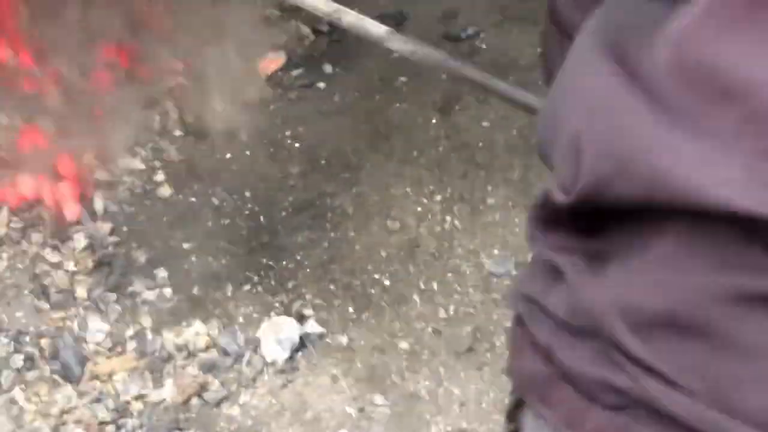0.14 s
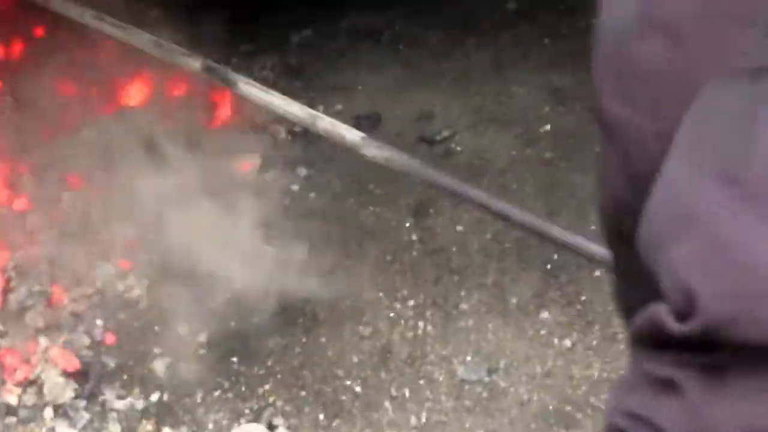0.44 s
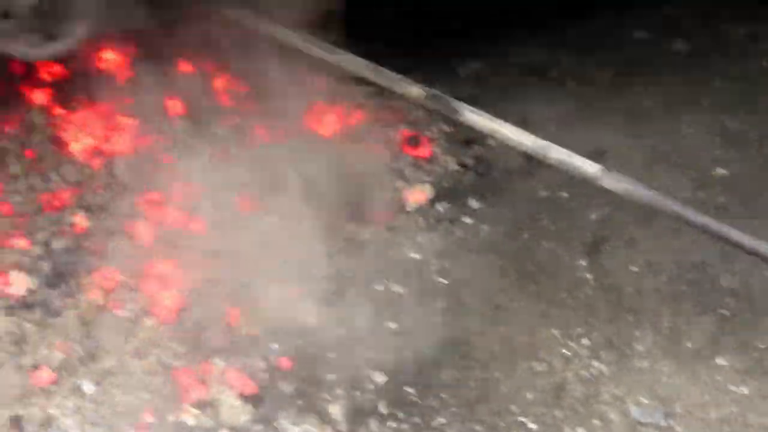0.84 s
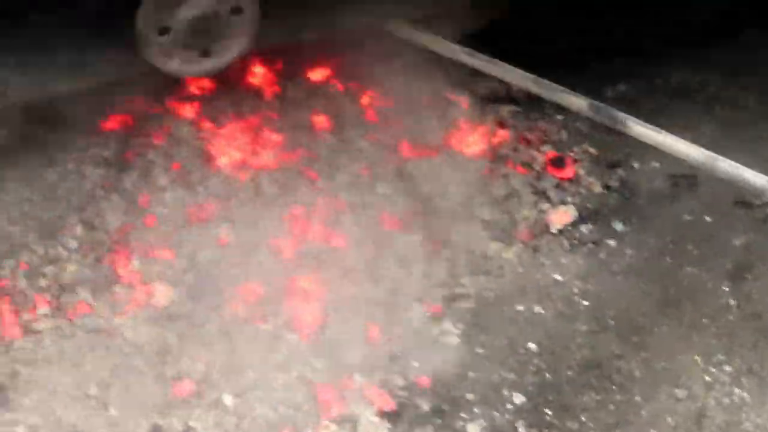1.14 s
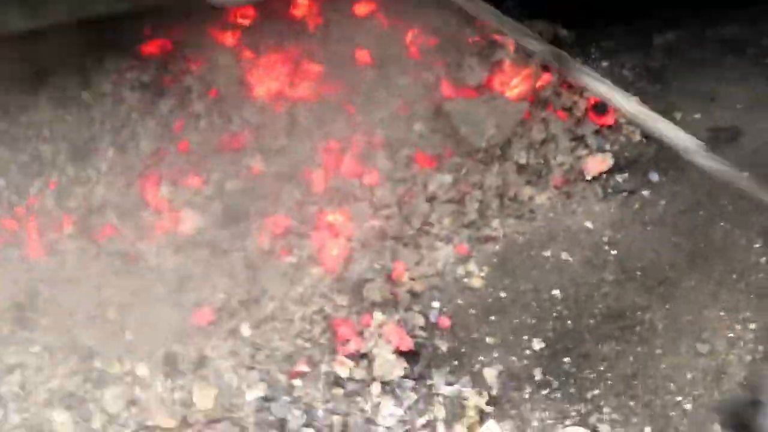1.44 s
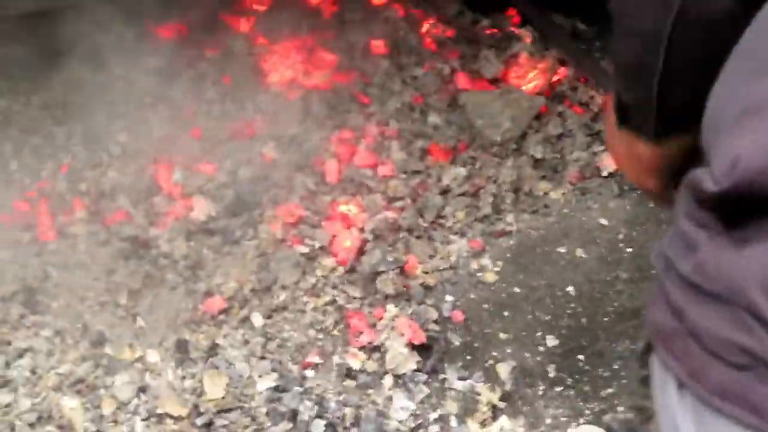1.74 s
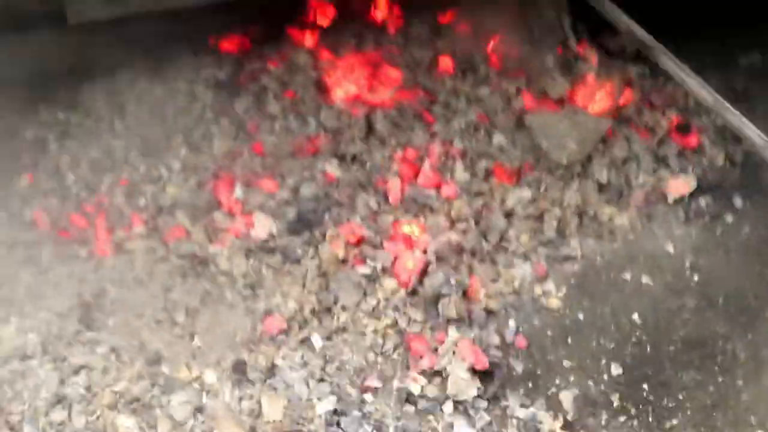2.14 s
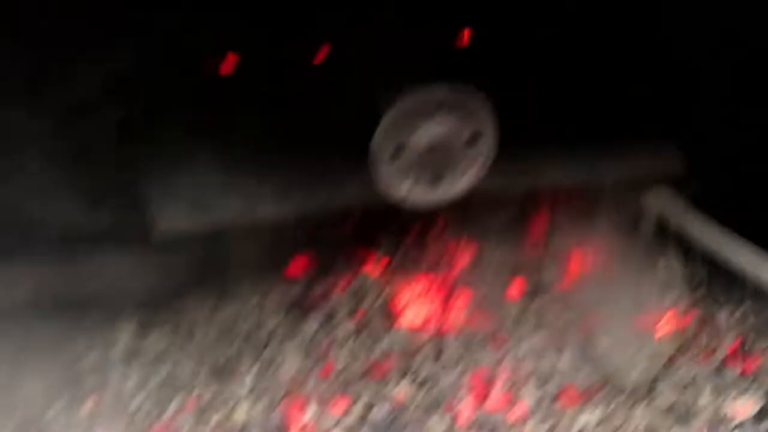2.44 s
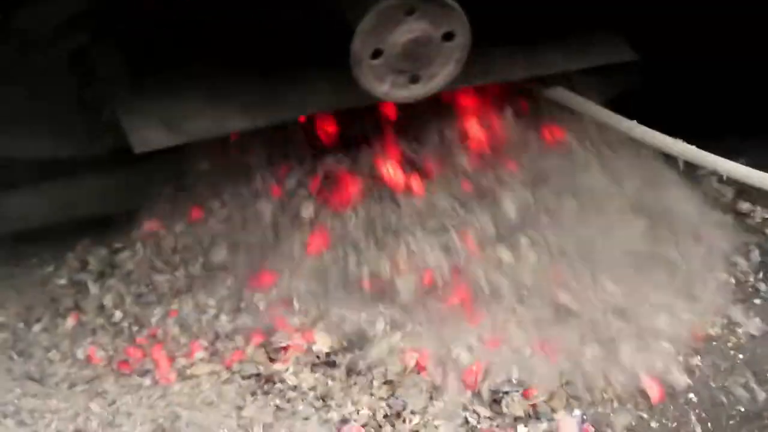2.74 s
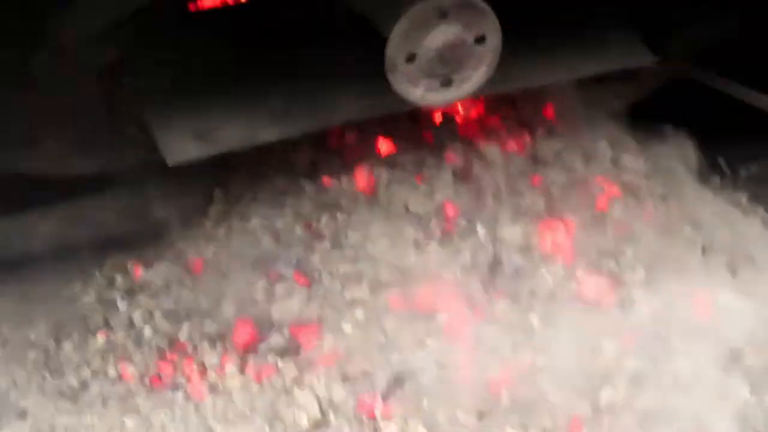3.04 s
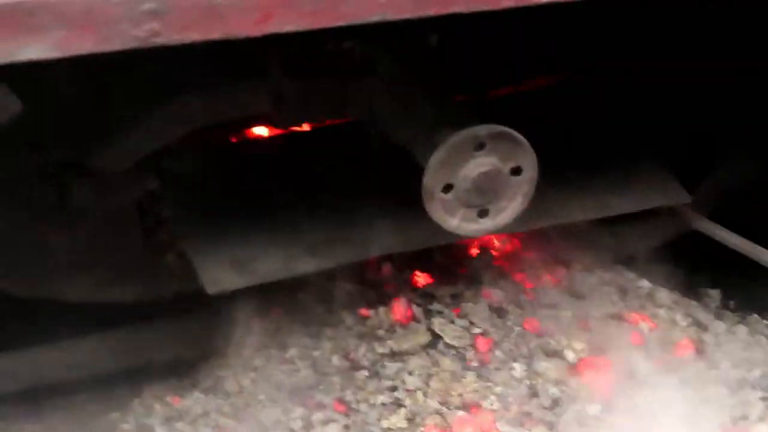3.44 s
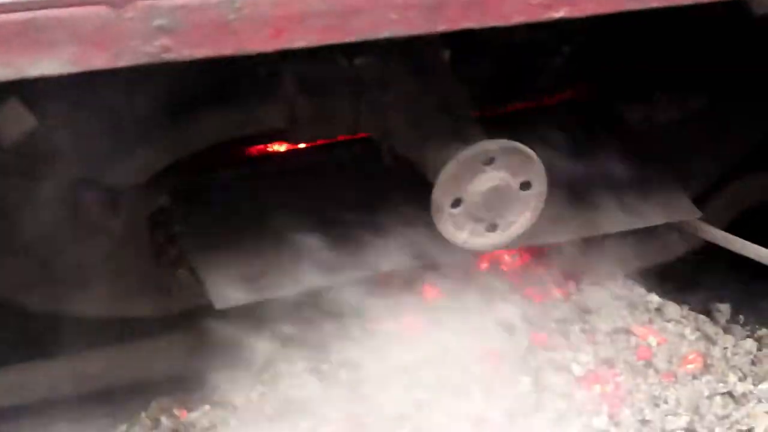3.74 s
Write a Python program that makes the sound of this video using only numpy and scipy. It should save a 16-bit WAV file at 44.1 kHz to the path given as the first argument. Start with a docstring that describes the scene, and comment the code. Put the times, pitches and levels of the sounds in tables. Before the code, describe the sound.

A small auxiliary steam engine on a standing locomotive chugs fast, alternating low and higher soft hoots over a deep rumble. After about a third, a short spurt starts a steady hiss of water on hot ash. Close, outdoors, stereo.

```python
"""Beside a standing steam locomotive, outdoors, over the rumble of the fire and a lumpy low noise.
From the start a small auxiliary steam engine turns about six times a second: each turn two pipes hoot,
one low with a knock and a puff of steam, one higher, while a turbine hums. Then water is turned on the
hot ash: a short spurt, then a steady hiss of steam, with brief moans in the rumble meanwhile.
Tones are sines, ringing comes from resonances, and fire and steam are coloured noise."""
import sys
import numpy as np
from scipy import signal
from scipy.fft import rfft, irfft, next_fast_len
from scipy.io import wavfile
from scipy.ndimage import map_coordinates

SR = 44100
rng = np.random.default_rng(int(sys.argv[2]) if len(sys.argv) > 2 else 0)


def voltage_ratio(level):
    """Linear amplitude factor for a level in decibels (scalar or array-like)."""
    return 10 ** (np.asarray(level, float) / 20)


def master_out(mix):
    """Clip the mix to full scale and print it as 16-bit PCM to the path in sys.argv[1]."""
    frames = np.transpose(np.atleast_2d(mix))
    ceiling = np.clip(frames, -1, 1)
    pcm = np.round(ceiling * 32767).astype(np.int16)
    wavfile.write(sys.argv[1], SR, pcm)


N = 171108
T = np.arange(N) / SR
SIZE = next_fast_len(N)
HZ = np.maximum(np.arange(SIZE // 2 + 1) * SR / SIZE, 1)


def rms_one(x):
    """Scale to rms 1."""
    return x / np.sqrt(np.mean(x ** 2) + 1e-20)


def in_time(rows):
    """Turn the columns after the first (seconds) into curves in time, joined by straight lines."""
    s, *columns = np.transpose(rows)
    return [np.interp(T, s, column) for column in columns]


def colour(points):
    """Gain at every frequency, from rows of Hz and dB joined on a log axis."""
    hz, db = np.transpose(points)
    return voltage_ratio(np.interp(np.log(HZ), np.log(hz), db))


def drift(rate_hz):
    """Slow random wandering of spread 1: noise smoothed at one fortieth of the sample rate."""
    hop, warm_up = 40, 2000
    r = np.exp(-2 * np.pi * rate_hz * hop / SR)
    noise = rng.standard_normal(N // hop + 2 + warm_up)
    slow = signal.lfilter([1], [1, -2 * r, r * r], noise)[warm_up:]
    return np.interp(np.arange(N) / hop, np.arange(len(slow)), rms_one(slow))


def resonance(x, hz, width_hz):
    """Two-pole resonance with gain 1 at its top: it rings on after a push."""
    r = np.exp(-np.pi * width_hz / SR)
    top = (1 - r * r) / 2
    return signal.lfilter([top, 0, -top], [1, -2 * r * np.cos(2 * np.pi * hz / SR), r * r], x + 1e-18)


def bump(s, length_s, squareness):
    """Swell and fall, above half height for the given length."""
    return .5 ** (np.abs(2 * (T - s) / length_s) ** squareness)


def stereo_white(side_table, pan_db, lag_sign=1):
    """Spectra of white noise at the two microphones: a shared part and an opposed part."""
    lag_share = 0.38  # share of the opposed part's power due to the lag between the microphones
    mid, side = rfft(rng.standard_normal((2, SIZE)))
    lagged = 1j * lag_sign * mid
    side = (np.sqrt(1 - lag_share) * side + np.sqrt(lag_share) * lagged) * colour(side_table)
    return np.array([mid * voltage_ratio(pan_db / 2) + side, mid * voltage_ratio(-pan_db / 2) - side])


def coloured_noise(spectrum, side_table, pan_db):
    """Steady stereo noise shaped by a spectrum table; rms 1."""
    white = stereo_white(side_table, pan_db)
    return rms_one(irfft(white * colour(spectrum), SIZE)[:, :N])


def hiss(spectrum, side_table, pan_db, patchy_db, shared_db, treble_db=0, lag_sign=1):
    """Coloured stereo noise in half-octave bands that flicker apart and together; rms 1."""
    noise = stereo_white(side_table, pan_db, lag_sign) * colour(spectrum)
    together = drift(13.0)
    first, last = int(2 * np.log2(spectrum[0][0] / 20)), 19
    step = np.clip(2 * np.log2(HZ / 20), first, last)  # half octaves above 20 Hz
    out = 0
    for k in range(first, last + 1):
        crossfade = np.cos(np.pi / 2 * np.clip(step - k, -1, 1)) ** 2
        band = irfft(noise * crossfade, SIZE)[:, :N]
        treble = treble_db if k >= 17 else 0  # bands centred above 7 kHz
        out = out + band * voltage_ratio(patchy_db * drift(10.0) + shared_db * together + treble)
    return rms_one(out)


def streaked(x):
    """Many narrow bands of the noise swell and fade on their own; rms 1."""
    depth_db, width_hz, life_s = 2, 50, .1
    hz, s, cells = signal.stft(x, SR, nperseg=2048)
    field = rng.standard_normal((600, 200))
    where = np.meshgrid(hz / width_hz, s / life_s, indexing="ij")
    streaks = rms_one(map_coordinates(field, where, order=3, mode="mirror"))
    return rms_one(signal.istft(cells * voltage_ratio(depth_db * streaks), SR, nperseg=2048)[1][:, :N])


def narrow_noise(table, side_table, pan_db):
    """Noise twice through each resonance: faint whistles and hollows, one for each row."""
    white = irfft(stereo_white(side_table, pan_db), SIZE)[:, :N]
    out = []
    for hz, width_hz, db in table:
        once = resonance(white, hz, width_hz)
        out.append(voltage_ratio(db) * rms_one(resonance(once, hz, width_hz)))
    return out


# Colour of the lumpy low noise. Each row: frequency in Hz, strength in dB per Hz (relative).
SIDE_COLOUR = [(25, -12), (60, -7), (100, 10), (200, 4), (400, -7.5), (800, -22), (1500, -37), (2500, -35)]
# How loud the lumpy low noise is. Each row: time in seconds, level in dB before the lumps.
SIDE_LEVEL = [(0, -50), (.2, -40), (.55, -48), (.85, -50), (1.03, -65), (1.2, -56), (1.45, -41),
              (1.67, -35), (1.8, -39), (1.95, -35.5), (2.2, -40), (2.55, -54), (2.9, -63), (3.1, -51),
              (3.3, -41), (3.5, -60), (3.7, -45), (3.88, -46)]


def side_noise():
    """Lumpy low noise, opposite in the two channels."""
    lumps_db = 4
    noise = rms_one(irfft(rfft(rng.standard_normal(SIZE)) * colour(SIDE_COLOUR), SIZE)[:N])
    level_db, = in_time(SIDE_LEVEL)
    return voltage_ratio(level_db + lumps_db * drift(10.5)) * noise * np.array([[1], [-1]])


# How loud the rumble is. Each row: time in seconds, level in dB.
RUMBLE_LEVEL = [(0, -24.5), (.5, -24.5), (1.0, -22.5), (1.6, -21.5), (2.4, -22), (3.1, -22.5), (3.88, -21)]
# Colour of fire roar and leaking steam. Each row: frequency in Hz, strength in dB per Hz (relative).
RUMBLE_COLOUR = [(20, -25), (45, -6.5), (80, -11), (125, -5.5), (190, 1), (260, -1), (330, -5), (500, -8),
                 (850, -14), (1050, -17.5), (1600, -22.5), (2600, -25.5), (4300, -31.5), (6000, -29.5),
                 (8000, -38), (12000, -42.5), (14000, -41), (15600, -60)]
# How the rumble differs between the microphones. Each row: frequency in Hz, opposed over shared part in dB.
RUMBLE_SIDE = [(30, -30), (50, -26), (70, -26), (110, -29), (200, -34), (300, -37), (450, -30), (800, -35),
               (1290, -32), (2380, -12), (4400, -9), (8120, 2.5), (15000, 8)]
# Hollow resonances. Each row: frequency in Hz, width of each pass in Hz, rms level in dB before it wavers.
HOLLOWS = [(370, 36, -34), (437.2, 44, -40), (598.5, 40, -44), (739.7, 23, -41), (843.4, 42, -43),
           (1940, 78, -46)]


def rumble():
    """Fire roar and leaking steam: flickering noise, with a few wavering hollow resonances."""
    db, = in_time(RUMBLE_LEVEL)
    roar = streaked(hiss(RUMBLE_COLOUR, RUMBLE_SIDE, pan_db=-0.33, patchy_db=1.0, shared_db=.3))
    hollows = sum(voltage_ratio(1.68 * drift(3.0)) * hollow for hollow in narrow_noise(HOLLOWS, RUMBLE_SIDE, 0))
    return voltage_ratio(db) * roar + voltage_ratio(db - db.mean()) * hollows


# Short moans. Each row: centre in seconds, length in seconds, start pitch in Hz, end pitch in Hz, peak in dB.
MOANS = [(1.55, .04, 370, 373, -23.5), (2.052, 0.12, 815, 852, -30), (3.478, 0.058, 365, 375, -21),
         (3.82, 0.037, 440, 445, -30)]


def moans():
    """Brief gliding tones: sines whose pitch slides from start to end."""
    out = 0
    for s, length_s, start_hz, end_hz, db in MOANS:
        hz = np.interp(T, [s - length_s / 2, s + length_s / 2], [start_hz, end_hz])
        out = out + voltage_ratio(db) * bump(s, length_s, 7.1) * np.sin(2 * np.pi * np.cumsum(hz) / SR)
    return out


# Parts of the hum. Each row: multiple of the base pitch, rms level in dB before it wavers, waver in dB.
HUM = [(1, -27.5, 1.2), (2, -40, 1.6), (3, -38, 4.5)]


def turbine():
    """A steady hum: a base tone and overtones, each wavering in level."""
    hum_hz = 32.93
    phase = 2 * np.pi * hum_hz * T + 0.2 * drift(3.8)
    out = 0
    for multiple, db, waver_db in HUM:
        out = out + np.sqrt(2) * voltage_ratio(db + waver_db * drift(2.3)) * np.sin(multiple * phase)
    return out


# How steam and puffs differ between the microphones. Each row: frequency in Hz, opposed over shared part in dB.
STEAM_SIDE = [(700, -40), (1290, -27), (2380, -15.5), (4400, -10.5), (8120, -7), (11000, -2.5), (15000, 4)]
STEAM_PAN_DB = -1.1  # first microphone over the second
# How loud the first spurt is. Each row: time in seconds, level in dB.
SPURT_LEVEL = [(1.28, -49), (1.298, -29), (1.325, -22.5), (1.343, -22), (1.362, -25.5), (1.385, -41),
               (1.41, -60)]
# Colour of the spurt. Each row: frequency in Hz, strength in dB per Hz (relative).
SPURT_COLOUR = [(700, -35), (1200, -8.5), (1800, -5), (2200, -11), (3000, -4), (3800, -8), (4500, -8),
                (7000, -12), (10000, -13.5), (14000, -32), (15600, -27)]


def spurt():
    """The first short spurt of water on the ash: a burst of coloured noise."""
    db, = in_time(SPURT_LEVEL)
    during = (T > SPURT_LEVEL[0][0]) * (T < SPURT_LEVEL[-1][0])
    return during * voltage_ratio(db) * coloured_noise(SPURT_COLOUR, STEAM_SIDE, STEAM_PAN_DB)


# Steam off the ash. Each row: time in seconds, level in dB, extra treble above about 7 kHz in dB.
JET = [(1.35, -56, -3), (1.385, -32.5, -4.5), (1.45, -29.5, 5), (1.52, -30, 0), (1.73, -30.5, 2.5),
       (1.83, -30.5, 1), (1.98, -30, 0.7), (2.2, -30.5, 1.5), (2.8, -28, 2.2), (3.01, -28, 1.3),
       (3.24, -28, -0.7), (3.67, -29.5, 1.8), (3.88, -27, -2)]
# Colour of the steam. Each row: frequency in Hz, strength in dB per Hz (relative).
STEAM_COLOUR = [(710, -28), (1200, -13), (1750, -1.5), (2120, -0.5), (2680, 0.5), (3390, -2), (4380, -3),
                (4930, -4.5), (7090, -5), (8690, -9), (12100, -14), (14200, -22.5), (15500, -24)]
# Faint whistles. Each row: frequency in Hz, width of each pass in Hz,
# rms level in dB at full jet before it wavers.
WHISTLES = [(2116.7, 270, -42), (2609, 220, -50), (3226, 150, -50), (3636, 181, -48), (4260, 150, -47.5),
            (6980, 250, -49), (9660, 200, -52)]
# Passing colours in the hiss. Each row: centre in seconds, length in seconds, frequency in Hz,
# width of each pass in Hz, rms level in dB at the top of the swell.
SWELLS = [(1.344, .035, 2147, 150, -22.5), (1.549, 0.24, 4456, 80.15, -37.5), (1.599, 0.64, 6950, 120, -39),
          (1.62, .15, 2680, 300, -40), (1.743, .1, 2660, 552.7, -28.5), (1.75, 0.14, 1440, 150, -35.5),
          (2.305, 0.33, 4600, 300, -39), (2.547, 0.34, 2150, 200, -41), (2.85, 0.31, 3920, 298, -37),
          (2.987, 0.1, 1230, 350, -33.5), (2.952, 0.17, 5520, 199.4, -41), (3.45, 0.33, 5900, 300, -40.5),
          (3.5, .3, 2350, 200, -38), (3.802, 0.23, 3686, 300.3, -41)]


def quenching_steam():
    """Water on hot ash makes steady steam: flickering noise with whistles and shifting colours."""
    db, treble_db = in_time(JET)
    jet = voltage_ratio(db) * streaked(hiss(STEAM_COLOUR, STEAM_SIDE, STEAM_PAN_DB, patchy_db=0.4, shared_db=0.9,
                                  treble_db=treble_db, lag_sign=-1))
    whistles = sum(voltage_ratio(2.5 * drift(4.0)) * whistle
                   for whistle in narrow_noise(WHISTLES, STEAM_SIDE, STEAM_PAN_DB))
    steam = (T > JET[0][0]) * (jet + voltage_ratio(db - db.max()) * whistles)
    colours = narrow_noise([row[2:] for row in SWELLS], STEAM_SIDE, STEAM_PAN_DB)
    for (s, length_s, *_), noise in zip(SWELLS, colours):
        steam = steam + bump(s, length_s, 1.5) * noise
    return steam


# Colour of the puffs. Each row: frequency in Hz, strength in dB per Hz (relative).
PUFF_COLOUR = [(700, -55), (1300, -1), (2000, -4.5), (2650, 2.5), (3000, -2.5), (3400, 3.5), (3900, -2.5),
               (5000, -6.5), (5700, -9), (6500, -14), (8000, -23), (12000, -53)]


def puffs():
    """A soft puff of exhaust steam with every low hoot: noise let through in short swells."""
    shift_s, length_s, typical_db, spread_db = -0.0068, 0.091, -35, 3.6
    levels_db = typical_db + spread_db * rng.standard_normal(len(LOW_HOOTS))
    gate = sum(voltage_ratio(db) * bump(hoot[0] + shift_s, length_s, 2.7) for hoot, db in zip(LOW_HOOTS, levels_db))
    return gate * coloured_noise(PUFF_COLOUR, STEAM_SIDE, pan_db=1.5)


# Tones of the knock. Each row: frequency in Hz, level against the hoot in dB before chance varies it,
# time in seconds for each of two resonances to fade by 60 dB.
KNOCK_MODES = [(129, -14.5, .07), (280, -19, 0.018), (389.3, -20.5, 0.059)]


def knocks():
    """A dull knock follows every low hoot: a click rings pairs of resonances."""
    delay_s, spread_db = 0.01001, 2.5
    s, hoot_db = np.transpose(LOW_HOOTS)[:2]
    at = ((s + delay_s) * SR).astype(int)
    out = 0
    for hz, mode_db, fade_s in KNOCK_MODES:
        width_hz = np.log(1000) / (np.pi * fade_s)
        clicks = np.zeros(N)
        clicks[at] = voltage_ratio(hoot_db + mode_db + spread_db * rng.standard_normal(len(s)))
        ringing = resonance(resonance(clicks, hz, width_hz), hz, width_hz)
        out = out + ringing * SR / width_hz / 2  # makes up for the level lost in narrow resonances
    return out


def pipe(hoots, squareness, ring_s, rough, octave_db, scoop_hz):
    """Each hoot blows a slightly unsteady tone that starts sharp and settles; the pipe rings on briefly."""
    rise_share = 0.91  # the rise is shorter than the fall
    s, db, length_s, hz = np.transpose(hoots)
    lead_s = ring_s / np.log(1000)  # blow a little early, as the ringing comes late
    k = np.searchsorted((s[1:] + s[:-1]) / 2, T)  # the nearest hoot
    place = 2 * (T + lead_s - s[k]) / length_s[k]  # -1 to 1 across the nominal length
    pitch_hz = hz[k] + scoop_hz * np.clip(-place, 0, 2) ** 2
    phase = 2 * np.pi * np.cumsum(pitch_hz) / SR + rough * drift(27.0)
    swell = .5 ** (np.abs(place / np.where(place < 0, rise_share, 1)) ** squareness)
    blow = voltage_ratio(db[k]) * swell * (1 + rough * drift(29.0))
    tone = resonance(blow * np.sin(phase), hz.mean(), 1 / (np.pi * lead_s))
    octave = voltage_ratio(octave_db) * blow * np.sin(2 * phase)
    return tone + octave


# Hoots of the high pipe. Each row: centre in seconds, strength of the blow in dB, nominal length in seconds,
# pitch it settles to in Hz.
HIGH_HOOTS = [(0.0, -4, 0.026, 218.4), (0.146, -11.5, 0.04, 220.0), (0.305, -9, 0.04, 218.8),
              (0.469, -11.5, 0.047, 218.1), (0.631, -12, 0.06, 222), (0.792, -9.5, 0.044, 217.6),
              (0.953, -9, 0.048, 218.5), (1.113, -8.5, 0.05, 220.9), (1.274, -8, 0.045, 218.4),
              (1.435, -8.5, 0.051, 220.2), (1.595, -9, 0.046, 219.3), (1.756, -9.5, 0.0448, 219.3),
              (1.916, -8, 0.045, 219.3), (2.078, -8.5, 0.051, 221), (2.236, -9.2, 0.054, 219.3),
              (2.399, -9.5, 0.05, 219.3), (2.558, -9.8, 0.059, 223.3), (2.715, -10, 0.051, 219),
              (2.877, -9.5, 0.049, 220.3), (3.034, -11, 0.048, 225.6), (3.196, -12.5, 0.052, 220.3),
              (3.355, -12, 0.039, 219.3), (3.511, -9.5, 0.028, 220.2), (3.675, -11, 0.041, 222.4),
              (3.836, -12.5, 0.054, 225.4)]


def high_pipe():
    """The higher hoot of each turn, a smoother tone."""
    return pipe(HIGH_HOOTS, squareness=3.2, ring_s=0.064, rough=0.06, octave_db=-22.5, scoop_hz=12)


# Hoots of the low pipe. Each row: centre in seconds, strength of the blow in dB, nominal length in seconds,
# pitch it settles to in Hz.
LOW_HOOTS = [(0.085, -8, 0.037, 163.4), (0.245, -10.5, 0.05, 166.4), (0.404, -9, 0.031, 163),
             (0.568, -10.5, 0.033, 163.2), (0.736, -10.5, 0.044, 161.1), (0.893, -5, 0.036, 163.2),
             (1.047, -7.5, 0.036, 164.5), (1.216, -4, 0.032, 166.2), (1.37, -7.5, 0.03, 164.5),
             (1.538, -6, 0.048, 166.2), (1.688, -7, 0.031, 165.4), (1.85, -6.5, 0.032, 166.2),
             (2.016, -9.5, 0.047, 165.8), (2.177, -8, 0.039, 164.5), (2.336, -7, 0.044, 166.2),
             (2.496, -9, 0.04, 166.2), (2.657, -7, 0.042, 164.4), (2.819, -6, 0.033, 164.5),
             (2.975, -6.5, 0.031, 165.6), (3.132, -5.5, 0.032, 163.9), (3.3, -6, 0.027, 166.2),
             (3.456, -8, 0.032, 167.9), (3.615, -6.5, 0.026, 164.2), (3.78, -8, 0.034, 161.4)]


def low_pipe():
    """The low hoot of each turn, a rougher tone that rings longer."""
    return pipe(LOW_HOOTS, squareness=1.84, ring_s=0.087, rough=0.17, octave_db=-21.5, scoop_hz=9.2)


def scene():
    """All sources at the two microphones."""
    background = side_noise() + rumble() + moans() + turbine()
    ash = spurt() + quenching_steam()
    engine = puffs() + knocks() + high_pipe() + low_pipe()
    return background + ash + engine


def low_pass(x):
    """Removes everything above the highest recorded frequency."""
    return signal.sosfilt(signal.butter(12, 15630, fs=SR, output="sos"), x)


def record(dry):
    """A steep filter removes the very top, 70 dB down from 16400 Hz on, before the finished mix."""
    top_cut = signal.cheby2(12, 70, 16400, fs=SR, output="sos")
    mix = signal.sosfilt(top_cut, dry)
    return low_pass(mix)


dry = scene()
out = record(dry)
master_out(out)
```